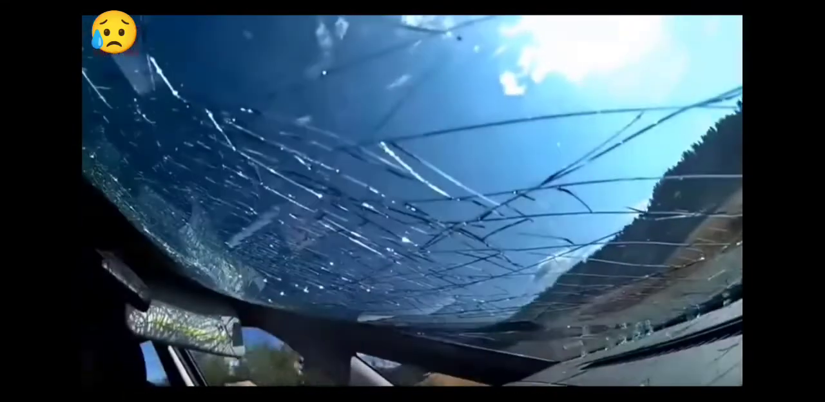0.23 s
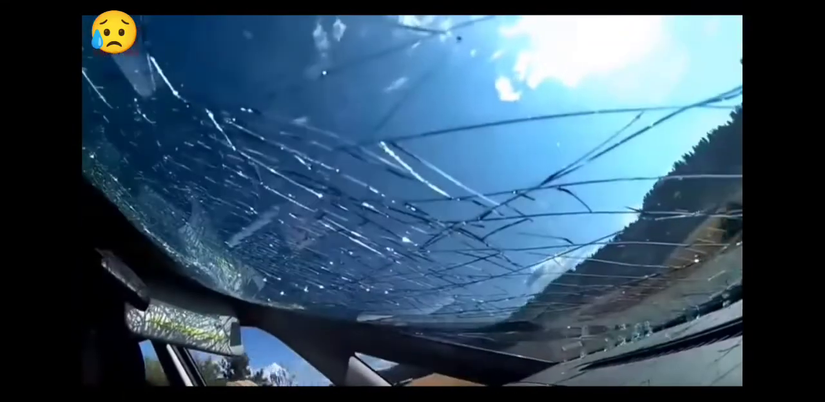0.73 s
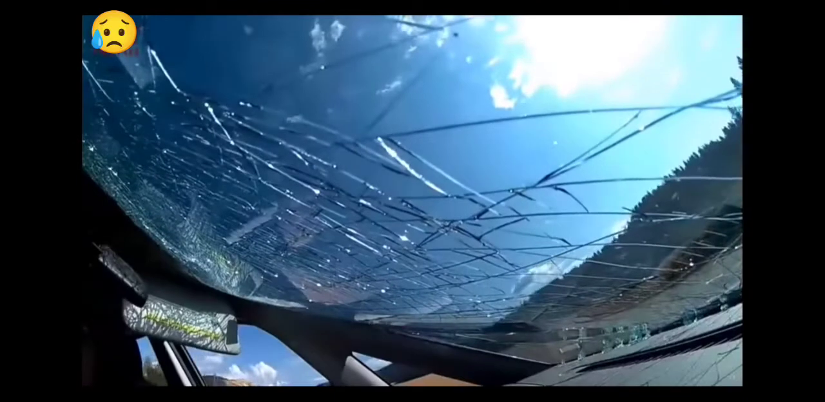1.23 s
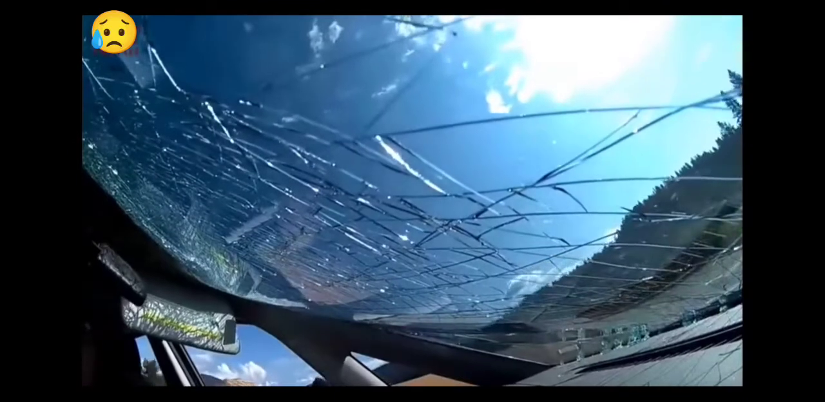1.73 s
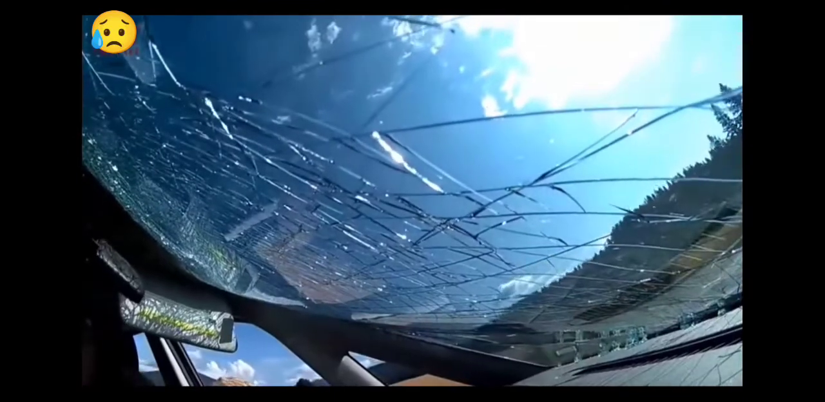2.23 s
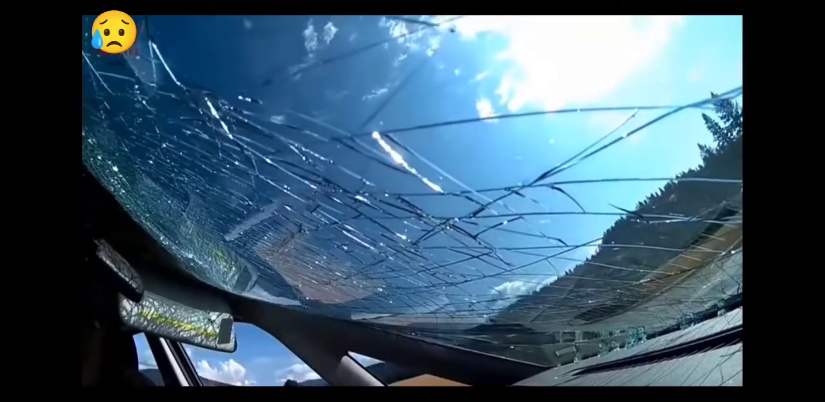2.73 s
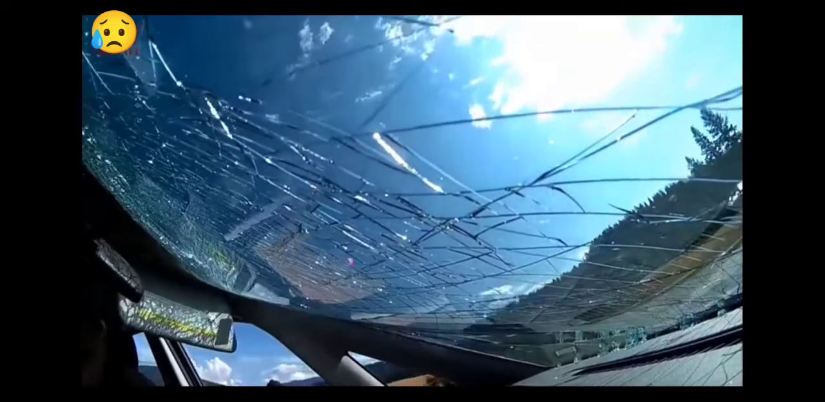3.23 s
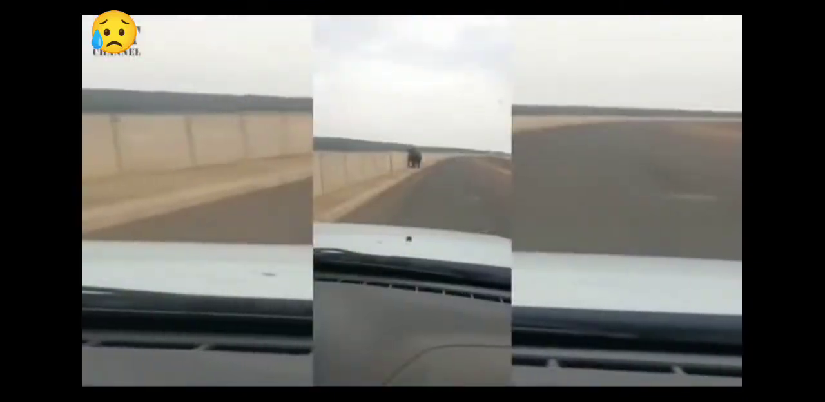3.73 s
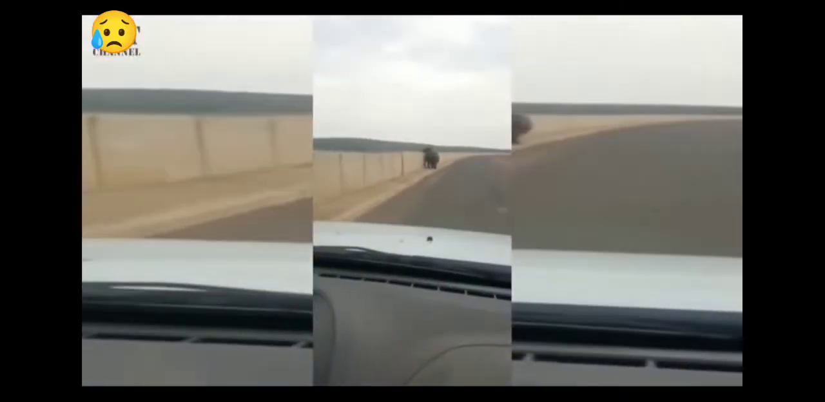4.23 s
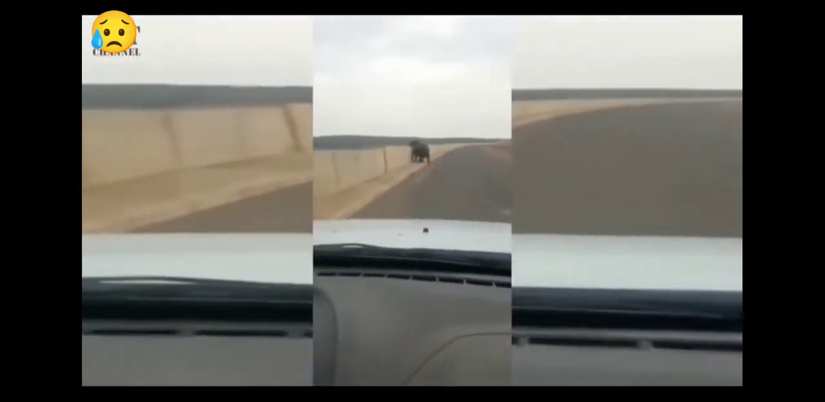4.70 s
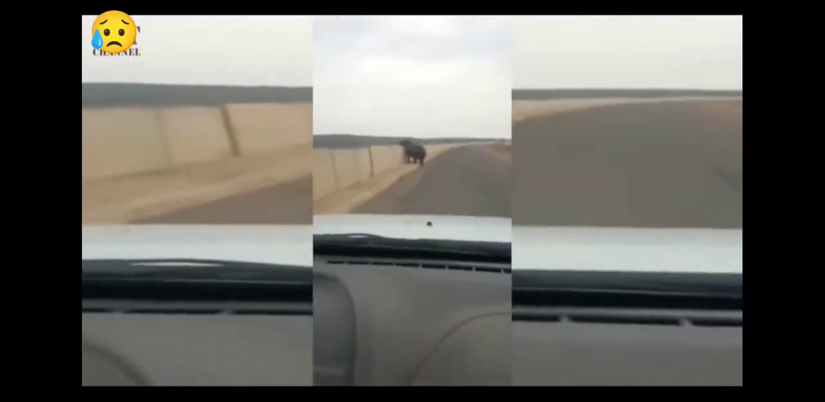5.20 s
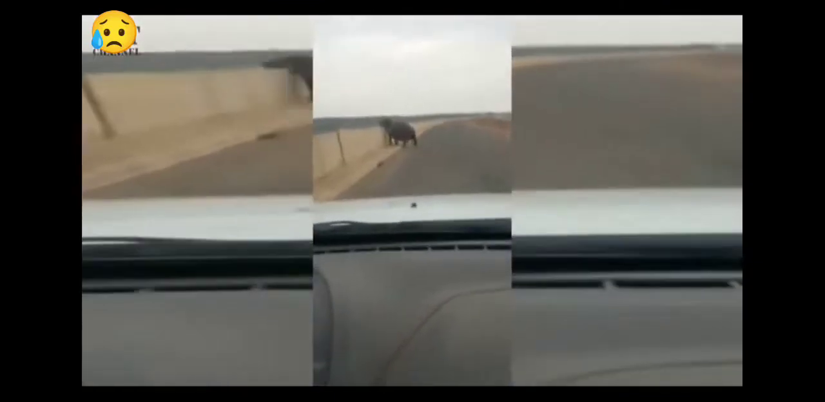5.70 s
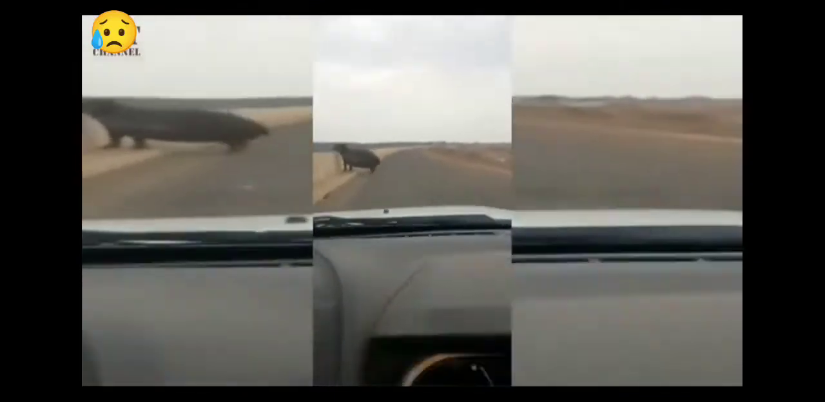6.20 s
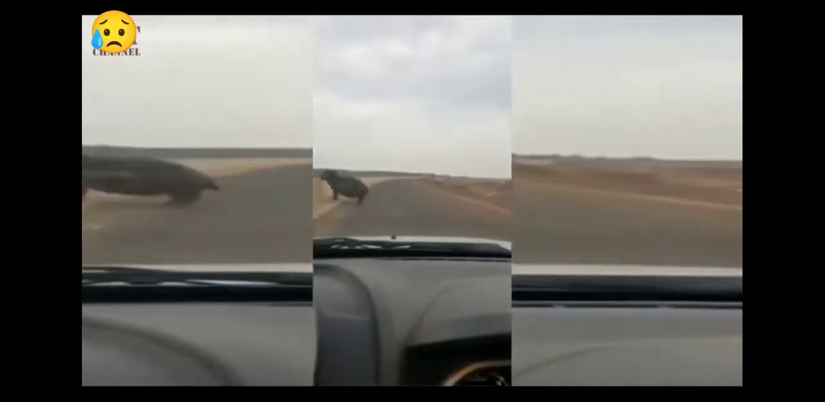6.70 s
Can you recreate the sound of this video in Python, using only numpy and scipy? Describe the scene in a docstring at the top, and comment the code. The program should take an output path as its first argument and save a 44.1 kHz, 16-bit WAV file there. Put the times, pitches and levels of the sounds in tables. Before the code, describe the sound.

Inside a car, a heavy impact and sharp glass cracks fade under sinking tyre hum, trim rattles, and a soft engine-and-road cruise follows.

```python
"""Car cabin after a crash at speed

The body booms, the broken windshield cracks and sheds crumbs of glass, and tyre roar and tread hum sink as
the car slows: filtered noise, ringing resonators and a gliding tone. Loose trim knocks, panels thud.
A quieter drive takes over: engine and cavity tones, road noise, buffeting air and hiss, ticks and rustles."""
import sys
import numpy as np
from scipy import signal
from scipy.fft import rfft, irfft, next_fast_len
from scipy.io import wavfile
from scipy.ndimage import uniform_filter1d

SR = 44100
rng = np.random.default_rng(int(sys.argv[2]) if len(sys.argv) > 2 else 0)


def master_out(mix):
    """Clip the mix to full scale and print it as 16-bit PCM to the path in sys.argv[1]."""
    frames = np.transpose(np.atleast_2d(mix))
    ceiling = np.clip(frames, -1, 1)
    pcm = np.round(ceiling * 32767).astype(np.int16)
    wavfile.write(sys.argv[1], SR, pcm)


N = 306495
SECONDS = np.arange(N) / SR

# Spectra of the slowing car's noise layers. Each row: frequency in Hz, relative level in dB.
HEAVE_SPECTRUM = [(16, -20), (26, 17), (35, 9.5), (48, 12), (58, -10)]
BOOM_SPECTRUM = [(48, -2.5), (58, 1), (75, 0), (100, -3), (130, -18.5)]
RUMBLE_SPECTRUM = [(65, -28.5), (110, -15), (124, 0), (232, 0.5), (269, -3.5), (345, -6), (532, -18),
                   (600, -20), (780, -46.5), (1320, -120)]
ROAR_SPECTRUM = [(260, -18.5), (450, 0), (729, -3.5), (856, -1.5), (1150, -3), (1500, -8), (1580, -6.5),
                 (1720, -14), (2330, -24), (2800, -28), (3640, -38.5), (6160, -120)]
# Stereo width of the crash noise. Each row: frequency in Hz, side against mid in dB.
CRASH_WIDTH = [(20, -78.5), (400, -64.5), (800, -24.5), (4400, -25.5), (15000, -8.5)]
# Levels at time zero in dB, and steady fades in dB per second; the boom holds its level.
HEAVE_DB, HEAVE_FADE_DB_PER_S = -20, 4
BOOM_DB = -23.5
RUMBLE_DB, RUMBLE_FADE_DB_PER_S = -18.5, 4.5
ROAR_DB, ROAR_FADE_DB_PER_S, ROLLING_DB = -28, 6.5, -46  # the roar sinks to that of slow rolling
# The blow at the start dies away in every layer.
IMPACT_HEAVE_DB, IMPACT_BOOM_DB, IMPACT_RUMBLE_DB, IMPACT_ROAR_DB, IMPACT_GLASS_DB = -8, -10.5, -12.5, -19, -31
IMPACT_FADE_DB_PER_S = 165
# Jolts that rock the body. Each row: start in seconds, length in seconds, heave level in dB.
BODY_JOLTS = [(.1, .12, -23), (.42, 0.11, -16), (.68, 0.022, -19), (.77, 0.078, -19), (1.28, 0.052, -17.5),
              (1.45, 0.25, -21), (1.62, 0.29, -22.5), (2.66, 0.14, -32), (3.35, 0.045, -31)]
JOLT_RUMBLE_DB = -4.5  # cabin rumble against the heave of a jolt

# Tread hum falling with the speed. Each row: time in seconds, mean pitch in Hz.
TREAD_PITCH = [(0.949, 254.4), (1.2, 240.7), (1.302, 221.7), (1.57, 195.6), (1.748, 187.3), (2.2, 160.6),
               (2.5, 150.5)]
# Cabin resonances that the hum sweeps through. Each row: frequency in Hz, width in Hz, added gain in dB.
HUM_RESONANCES = [(233.6, 30, -25.5), (189.3, 7.4, -25)]
HUM_DB = -32.5  # between the resonances

# Windshield cracks. Each row: start in seconds, peak level in dB, edge against body in dB,
# decay by 60 dB in seconds, ring of the shard in Hz, shard against body in dB.
WINDSHIELD_CRACKS = [(0.0277, -7, -19.5, 0.028, 4300, -19), (0.048, -28, -9, 0.014, 2500, -10),
                     (0.0588, -12.5, -22, 0.019, 2480, -1), (.097, -23, -15, .037, 1400, 3),
                     (0.149, -9, -25.5, 0.094, 1010, -18), (.321, -18, -17, 0.091, 1740, 2),
                     (0.3294, -21.5, 6, 0.012, 6500, -14), (0.429, -23.5, -17, 0.062, 1100, -5),
                     (.565, -22.5, -19, 0.18, 1570, -12), (0.591, -21.5, -18, 0.25, 1290, 1),
                     (0.613, -17.5, -27, 0.019, 1090, 7), (0.6632, -14, -28, 0.0087, 2560, 2),
                     (0.8281, -10, -4.5, 0.024, 2900, -3), (0.9343, -17.5, -7, 0.024, 4740, -21),
                     (1.0432, -19.5, -22, 0.011, 2150, -3), (1.102, -24, -19.5, 0.081, 1740, -5),
                     (1.184, -22.5, -28, 0.077, 3620, -19), (1.7925, -11, -11, 0.04, 1530, -13),
                     (2.154, -39, 11, 0.081, 6150, -13), (2.503, -34.5, 9, 0.012, 5670, 11),
                     (2.61, -40.5, 21, .018, 5500, -7), (2.691, -32.5, -28, 0.057, 2510, -9),
                     (2.777, -33, -10, 0.026, 4800, 5), (2.872, -36.5, 3, 0.017, 5370, -15),
                     (3.09, -26.5, -20, 0.093, 1450, -5), (3.101, -28, -15.5, 0.037, 3450, -6),
                     (3.278, -28.5, -21, 0.083, 4100, -14), (3.3715, -31.5, -5, 0.038, 2700, 7)]
# Spectra of a crack's body and bright edge. Each row: frequency in Hz, relative level in dB.
CRACK_BODY_SPECTRUM = [(250, -13), (500, 19), (1000, 17.5), (1600, 17), (2100, 9.5), (2900, 3.5),
                       (4100, -8.5), (6000, -32)]
CRACK_EDGE_SPECTRUM = [(2500, -8), (3400, 3.5), (4500, 5), (5800, 1.5), (7500, 1), (10000, -5), (11700, 1),
                       (14000, -17), (15500, -19.5)]
# Modes of the pane. Each row: frequency in Hz, width in Hz, relative level in dB.
PANE_MODES = [(995, 90, 1), (1600, 90, 2), (2260, 140, -5), (2960, 100, 1), (3700, 100, -1),
              (4750, 120, -3), (5770, 90, 3), (6930, 130, -2)]
SPRAY_DB, SPRAY_T60_S = -19.5, 0.15  # splinters after each crack, before the edge filter
SHARD_WIDTH_HZ = 130

# Spectrum of fine glass grit. Each row: frequency in Hz, relative level in dB.
GRIT_SPECTRUM = [(1200, -8.5), (2000, 3.5), (2800, 0), (3600, -1.5), (4600, -0.5), (5600, -4),
                 (7500, -16.5), (10000, -19.5), (11600, -12), (15000, -45)]
GRIND_DB, GRIND_FADE_DB_PER_S, GRIND_REST_DB = -44.5, 16.5, -62.5  # the broken pane settles
GRIND_FITS_DB = 3.5  # spread of the grinding level
# The pane flexes and grinds again. Each row: start in seconds, length in seconds, level in dB.
PANE_FLEXES = [(.36, 0.52, -52), (1.57, 0.27, -59), (2.44, 0.35, -55), (2.92, 0.58, -52)]
# Coarse crumbs crunching where the pane is crushed. Each row: start in seconds, length in seconds, level in dB.
CRUMB_CRUNCHES = [(0, .05, -29), (.152, .04, -28), (.32, .04, -32), (.45, .26, -40), (3.088, .03, -41),
                  (3.23, .07, -49)]
# Glass edges squealing. Each row: start in seconds, length in seconds, level in dB.
EDGE_SQUEALS = [(3.018, .05, -55), (3.13, .07, -57)]
# Spectrum of the squeal. Each row: frequency in Hz, relative level in dB.
SQUEAL_SPECTRUM = [(2450, -20), (2700, -2), (2790, 2), (2890, -3), (3200, -18)]
# Small chips of glass falling. Each row: start in seconds, peak level in dB, ring in Hz.
GLASS_CHIPS = [(1.269, -48.5, 3800), (1.411, -47, 4470), (1.648, -41.5, 4760), (1.912, -50, 5470),
               (1.961, -45, 4470), (2.03, -52, 5500), (2.291, -48.5, 5500), (2.459, -47, 3970),
               (3.237, -45, 5000), (3.334, -49, 4000)]

# Panels thudding. Each row: start in seconds, peak level in dB, centre frequency in Hz.
PANEL_THUDS = [(.011, -12, 560), (.029, -13, 650), (0.039, -21, 306), (0.057, -5, 247), (.151, -13, 596),
               (.187, -14, 330), (.324, -17, 600), (.831, -14.5, 590), (0.934, -17, 475), (1.797, -15, 415),
               (2.644, -24, 700), (3.373, -21, 108), (3.423, -24, 134), (3.473, -22.5, 338),
               (4.636, -30.5, 1000), (5.483, -32, 690), (5.613, -23, 329), (5.613, -31.5, 940),
               (6.081, -36, 750)]
# Loose trim knocking. Each row: start in seconds, peak level in dB, pitch as a ratio to the usual ring,
# change of the upper modes in dB, change of the lowest mode in dB.
TRIM_KNOCKS = [(3.372, -28, .85, -8, -6), (3.413, -32, 1.07, 8, -6), (3.426, -20, 1.03, -6, -6),
               (3.472, -25, 1.02, 2, 6), (3.526, -38, 1.03, 4, 0), (3.550, -28, 1.0, -2, -6),
               (3.602, -33, .94, 0, 0), (3.6135, -24.5, .97, 3, -8), (3.679, -32, .86, 1, -6)]
# Modes of the trim. Each row: nominal frequency in Hz, decay by 60 dB in seconds, relative level in dB.
TRIM_MODES = [(370, .04, -4), (820, .02, -6), (1060, 0.032, 3), (1590, .024, -2), (1900, 0.016, -4),
              (2320, 0.036, -7)]
KNOCK_SAG, KNOCK_SETTLE_S = .12, .005  # initial flatness as a share of pitch, and its time constant
# Small plastic ticks. Each row: start in seconds, peak level in dB, ring in Hz, decay by 60 dB in seconds,
# level two octaves above the ring in dB.
PLASTIC_TICKS = [(3.5798, -29, 3600, .002, -22), (4.0317, -21.5, 2100, .003, -25),
                 (4.534, -33, 2900, .014, -42), (4.590, -38, 2000, .014, -28),
                 (4.6345, -26, 8500, .018, -22), (4.636, -31, 1600, .02, -18),
                 (5.192, -39, 3000, .006, -18), (5.606, -34, 7000, .008, -22),
                 (5.6115, -31, 2800, .018, -20), (5.6125, -33, 11000, .01, -22),
                 (6.0088, -25, 2200, .004, -26), (6.041, -31, 2000, .007, -26),
                 (6.082, -27.5, 2400, .008, -26), (6.841, -42, 5500, .003, -22)]

CHANGE_S = 3.43  # the quiet drive takes over
# Engine. Each row: time in seconds, firing rate in Hz, firing line in dB, half-order line in dB.
ENGINE_LINES = [(3.5, 105.1, -34.5, -38), (3.8, 104.1, -44, -57), (4.5, 104.4, -39.5, -44),
                (4.95, 101.5, -41, -35.5), (5.3, 104.5, -39, -38), (6, 107.2, -38, -37),
                (6.12, 106.3, -48.5, -60), (6.5, 109.8, -43.5, -57), (6.95, 109.5, -45, -59)]
# Upper lines of the engine. Each row: multiple of the firing rate, mean level in dB.
ENGINE_ORDERS = [(2, -49), (3, -63), (3.5, -52), (4, -60), (5, -59.5), (8, -63)]
# Tyre and road noise. Each row: time in seconds, tyre cavity drone in dB, road noise in dB.
CRUISE_LEVELS = [(3.5, -40.5, -38.5), (3.9, -36, -41.5), (4.35, -39, -42), (4.7, -36, -41.5),
                 (5.2, -41, -42.5), (5.5, -38.5, -39.5), (5.97, -38, -40.5), (6.15, -46.5, -46.5),
                 (6.42, -43.5, -43), (6.95, -44.5, -46.5)]
# Spectra of the driving noise. Each row: frequency in Hz, relative level in dB.
CAVITY_SPECTRUM = [(120, -7.5), (155, -6), (180, 1), (203, -4), (228, -3), (260, -14)]
ROAD_SPECTRUM = [(150, -47.5), (260, -8), (302, -6), (328, -7), (366, -1.5), (481, -8), (527, -7.5),
                 (578, -12), (706, -11.5), (761, -18), (820, -16), (1100, -22.5), (1900, -39.5),
                 (2470, -62), (4180, -120)]
SLAP_SPECTRUM = [(690, -26), (820, 8), (910, -9), (1010, 0.5), (1140, -20.5)]
BUFFET_SPECTRUM = [(18, -26.5), (32, -4), (56, -14), (85, -9), (130, -18.5)]
WIND_SPECTRUM = [(1050, -3), (1300, -3), (1700, -4.5), (2300, -7), (4000, -16), (7000, -22), (11000, -26),
                 (15000, -32)]
# Stereo width of the cabin noise. Each row: frequency in Hz, side against mid in dB.
CABIN_WIDTH = [(20, -10), (200, -17.5), (380, -10.5), (700, -1), (1300, 1), (15000, -0.5)]
# Singing air in the tyres. Each row: time in seconds, mean pitch in Hz, mean level in dB.
CAVITY_TONE = [(3.6, 194, -46), (3.95, 195, -40), (4.4, 192, -44), (5.0, 201, -40), (5.5, 183, -41),
               (6.05, 178, -47), (6.4, 193, -46), (6.95, 196, -51)]
SLAP_DB = -56
# Gusts that buffet the cabin. Each row: start in seconds, length in seconds, level in dB before the throb.
CABIN_GUSTS = [(3.45, 0.3, -32.5), (3.75, 0.92, -36), (5.28, 0.55, -39), (5.75, 0.31, -40.5),
               (6.35, 0.14, -36.5)]
CALM_DB = -45  # buffeting between gusts, before the throb
# Throbbing cabin air. Each row: time in seconds, mean pitch in Hz, fundamental in dB, octave in dB.
CABIN_THROB = [(3.6, 33, -55, -53), (3.95, 32.35, -42, -31), (4.351, 32.94, -28.5, -43),
               (4.75, 32.8, -32.5, -44), (5.05, 33.4, -43, -47)]
THROB_WAVER_DB = 1
# Hiss at the seals. Each row: time in seconds, level in dB.
WIND_LEVEL = [(3.6, -57), (3.85, -63), (4.15, -56.5), (4.9, -59.5), (5.7, -56.5), (5.95, -62.5), (6.4, -58),
              (6.95, -61.5)]
WIND_FLUTTER_DB, WIND_PAN_DB = 1.2, -2
# Rustles. Each row: start in seconds, length in seconds, relative level in dB, emphasized frequency in Hz.
CABIN_RUSTLES = [(4.078, 0.13, -61.5, 6000), (4.314, 0.055, -56.5, 9000), (4.606, 0.069, -58, 7990),
                 (4.795, 0.11, -58.5, 3600), (5.08, 0.13, -60.5, 9600), (5.36, 0.41, -60, 3700),
                 (5.532, 0.092, -65, 3580), (5.595, 0.079, -48, 6500), (5.677, 0.056, -47.5, 3700),
                 (6.001, 0.11, -50, 4847), (6.073, .08, -63, 13000), (6.17, 0.19, -62.5, 3320)]
# Soft scuffs. Each row: start in seconds, length in seconds, level in dB.
CABIN_SCUFFS = [(4.318, 0.02, -42), (5.1, 0.08, -52), (5.122, .02, -46), (5.935, 0.046, -54.5),
                (6.36, 0.075, -56)]
# Spectra of the rustles and scuffs. Each row: frequency in Hz, relative level in dB.
RUSTLE_SPECTRUM = [(1060, -60), (1800, 3), (2600, 2.5), (3600, 4), (4760, 1), (6770, 0.5), (10000, -4),
                   (13300, -4.5), (15500, -10)]
SCUFF_SPECTRUM = [(1050, 7), (1280, 7.5), (1420, 1), (1580, 1.5), (1850, -7), (2150, -7), (3200, -16)]
RUSTLE_GRAIN_DB, RUSTLE_CATCH_DB, RUSTLE_PAN_DB = 1.5, .7, -4.5
TOP_HZ = 15500


def slowing_car():
    """Broadband excitation: the blow and jolts drive low noise bands, and most sink as the car slows."""
    jolts = swells(BODY_JOLTS, rise=0.3, fall=0.39)
    heave = together(impact(IMPACT_HEAVE_DB), fading(HEAVE_DB, HEAVE_FADE_DB_PER_S), jolts)
    boom = together(impact(IMPACT_BOOM_DB), undb(BOOM_DB))
    rumble = together(impact(IMPACT_RUMBLE_DB), fading(RUMBLE_DB, RUMBLE_FADE_DB_PER_S),
                      jolts * undb(JOLT_RUMBLE_DB))
    roar = together(impact(IMPACT_ROAR_DB), fading(ROAR_DB, ROAR_FADE_DB_PER_S), undb(ROLLING_DB))
    return (heave * flow(HEAVE_SPECTRUM, CRASH_WIDTH, flutter_db=1.5)
            + boom * flow(BOOM_SPECTRUM, CRASH_WIDTH, flutter_db=1.5)
            + rumble * flow(RUMBLE_SPECTRUM, CRASH_WIDTH, flutter_db=1.2)
            + roar * flow(ROAR_SPECTRUM, CRASH_WIDTH, flutter_db=1.0, rate=71))


def impact(db):
    """Exponential decay: the first blow dies away at a constant rate in dB."""
    return fading(db, IMPACT_FADE_DB_PER_S)


def tread_hum():
    """Swept resonance: the hum falls with the speed and swells as it crosses each cabin resonance."""
    hz, = curves(TREAD_PITCH)
    gain = undb(HUM_DB)
    for centre, width, db in HUM_RESONANCES:
        gain = gain + undb(db) / (1 + (2 * (hz - centre) / width) ** 4)
    tone = unit(np.sin(phase_of(hz * (1 + .012 * walk(40))))) * undb(2 * walk(45))
    return tone * gain * during(TREAD_PITCH[0][0], TREAD_PITCH[-1][0])


def cracks():
    """Brittle fracture: a jerky run rings the pane and a shard, and throws a bright spray of splinters."""
    out = np.zeros((2, N))
    for s, peak_db, edge_db, t60, shard_hz, shard_db in WINDSHIELD_CRACKS:
        run = sputter(burst(t60, side_db=-22, rise=0.00093), spread_db=2.2)
        snap = run + undb(-8.0) * burst(t60=0.009, side_db=-18.0, rise=0.0043)
        spray = sputter(burst(SPRAY_T60_S, side_db=-10), spread_db=5)
        shard = ring(snap, [(shard_hz, SHARD_WIDTH_HZ, 0), (shard_hz, shard_hz / 2, -9)])
        shard = colour(shard, [(shard_hz * 0.5, -14), (shard_hz, 0), (shard_hz * 1.92, -14)])
        bright = snap + undb(SPRAY_DB) * spray
        body = unit(colour(snap + ring(snap, PANE_MODES), CRACK_BODY_SPECTRUM))
        edge = unit(colour(bright + ring(bright, PANE_MODES), CRACK_EDGE_SPECTRUM))
        add(out, s, body + undb(edge_db) * edge + undb(shard_db) * unit(shard), peak_db)
    return out


def crumbs():
    """Granular friction: broken edges grind as fine grit, crunch as coarse crumbs and squeal roughly."""
    fine = grains(per_s=1800, scatter_db=3, width_hz=60, low_hz=1500, high_hz=14000)
    coarse = grains(per_s=420, scatter_db=3.4, width_hz=110, low_hz=700, high_hz=5200)
    grind = together(impact(IMPACT_GLASS_DB), fading(GRIND_DB, GRIND_FADE_DB_PER_S), undb(GRIND_REST_DB),
                     swells(PANE_FLEXES, rise=0.1, fall=0.92))
    fits = unit(undb(GRIND_FITS_DB * walk(22.13)))
    crunch = unit(colour(coarse, [(700, 2.5), (1600, 0.5), (3000, -9.5), (5000, -16), (7000, -30)]))
    crunch = crunch * swells(CRUMB_CRUNCHES, rise=0.49, fall=1.0)
    squeal = flow(SQUEAL_SPECTRUM, CRASH_WIDTH, flutter_db=4, rate=60) * swells(EDGE_SQUEALS, rise=.2, fall=.3)
    return unit(colour(fine, GRIT_SPECTRUM)) * grind * fits + crunch + squeal


def grains(per_s, scatter_db, width_hz, low_hz, high_hz, count=18):
    """Shot excitation: random clicks of scattered size each ring one of a few shard pitches."""
    out = 0
    for hz in np.geomspace(low_hz, high_hz, count) * undb(.5 * rng.standard_normal(count)):
        clicks, at = np.zeros(N), rng.integers(0, N, 4000)
        chance, size = rng.random((2, len(at)))
        kept = chance < per_s * N / SR / count / len(at)
        clicks[at] = undb(scatter_db * np.minimum(-np.log(size), 4)) * kept
        out = out + ring(clicks, [(hz, width_hz * np.sqrt(hz / 3000), 0), (hz, hz, -18)])
    return out


def chips():
    """Struck plate: each falling chip ticks against the pane and rings at its own pitch."""
    out = np.zeros((2, N))
    for s, db, hz in GLASS_CHIPS:
        tick = burst(t60=0.077, side_db=-22, rise=0.00066)
        spectrum = [(hz / 2, -8), (hz, 0), (1.8 * hz, -16), (3 * hz, -22)]
        add(out, s, colour(tick + ring(tick, PANE_MODES), spectrum), db)
    return out


def panel_thuds():
    """Damped impact: larger panels give a short noise burst about one broad resonance."""
    out = np.zeros((2, N))
    for s, db, hz in PANEL_THUDS:
        add(out, s, colour(burst(t60=0.038, side_db=-50), [(hz / 2, -8), (hz, 0), (2 * hz, -16)]), db)
    return out


def trim_knocks():
    """Modal ringing: loose trim knocks repeatedly with a hollow ring."""
    out = np.zeros((2, N))
    for s, db, pitch, upper_db, low_db in TRIM_KNOCKS:
        add(out, s, knock(pitch, upper_db, low_db), db)
    return out


def knock(pitch, upper_db, low_db, rise=0.0022):
    """Contact loading: modes rise in pitch as a padded blow lets go; a rattle sounds with it and lasts longer."""
    t = np.arange(SR // 8) / SR
    bent = np.cumsum(1 - KNOCK_SAG * np.exp(-t / KNOCK_SETTLE_S)) / SR
    tone = 0
    for k, (hz, t60, db) in enumerate(TRIM_MODES):
        level_db = db + upper_db * (k > 2) + low_db * (k == 0)
        cycles = hz * pitch * rng.uniform(.98, 1.02) * bent + rng.random()
        tone = tone + undb(level_db - 60 * t / t60) * np.sin(2 * np.pi * cycles)
    rattle = colour(burst(t60=.13, side_db=-8, rise=.001), [(350, 0), (900, 1), (2200, -4), (3000, -26)])
    return unit(tone * (1 - np.exp(-(t / rise) ** 2))) + undb(-7) * unit(rattle)


def plastic_ticks():
    """Short contact: small plastic parts tick with a rapid decay and a faint longer tail."""
    out = np.zeros((2, N))
    for s, db, hz, t60, top_db in PLASTIC_TICKS:
        contact = burst(t60, side_db=-9) + undb(-32) * burst(t60=.05, side_db=0)
        tick = colour(contact, [(hz / 2, -11), (hz, 0), (1.7 * hz, -10), (4 * hz, top_db)])
        add(out, s, pan(tick, -1.0), db)
    return out


def engine():
    """Harmonic series: the firing line, its half order and wavering upper orders follow the firing rate."""
    firing_hz, firing_db, half_db = curves(ENGINE_LINES)
    low_lines = drone(firing_hz / 2, half_db, firing_db, waver_db=0.5)
    phase = phase_of(firing_hz * (1 + .004 * walk(7)))
    upper_lines = sum(unit(np.sin(k * phase)) * undb(db + 2 * walk(5)) for k, db in ENGINE_ORDERS)
    return pan(low_lines + upper_lines, 0.94)


def road_and_cavity_noise():
    """Resonant filtering: rolling noise is shaped by the road path and by the tyres' air cavities."""
    cavity_db, road_db = curves(CRUISE_LEVELS)
    cavity = flow(CAVITY_SPECTRUM, CABIN_WIDTH, flutter_db=1.0) * undb(cavity_db)
    road = flow(ROAD_SPECTRUM, CABIN_WIDTH, flutter_db=0.7) * undb(road_db)
    return pan(cavity, 0.94) + pan(road, 0.64)


def tyres():
    """Cavity resonance: the tyres' air sings unsteadily while the tread slaps the road."""
    hz, db = curves(CAVITY_TONE)
    tone = unit(np.sin(phase_of(hz * (1 + .02 * walk(14))))) * undb(db + 2.5 * walk(10))
    slap = flow(SLAP_SPECTRUM, CABIN_WIDTH, flutter_db=2, rate=27)
    return tone + slap * undb(SLAP_DB)


def cabin_air():
    """Flow locking: the air buffets at random, and less so while it locks into a throb."""
    throb_hz, throb_db, octave_db = curves(CABIN_THROB)
    gusts = together(swells(CABIN_GUSTS, rise=0.22, fall=.25), undb(CALM_DB))
    unlocked = 1 / np.sqrt(1 + undb(throb_db + 26.0) ** 2)
    buffet = flow(BUFFET_SPECTRUM, CABIN_WIDTH, flutter_db=1.5) * gusts * unlocked
    throb = drone(throb_hz, throb_db, octave_db, waver_db=THROB_WAVER_DB)
    return pan(buffet + throb * during(CABIN_THROB[0][0], CABIN_THROB[-1][0]), 0.94)


def wind():
    """Turbulence noise: air at the seals gives a thin fluttering hiss."""
    wind_db, = curves(WIND_LEVEL)
    hiss = flow(WIND_SPECTRUM, CABIN_WIDTH, flutter_db=WIND_FLUTTER_DB, rate=40)
    return pan(hiss, WIND_PAN_DB) * undb(wind_db)


def rustles():
    """Stick-slip friction: something slides in grainy swishes of their own brightness and squeaky scuffs."""
    rub = flow(RUSTLE_SPECTRUM, CABIN_WIDTH, flutter_db=RUSTLE_GRAIN_DB, rate=330)
    rub = rub * unit(undb(RUSTLE_CATCH_DB * walk(70)))
    swishes = 0
    for s, length, db, hz in CABIN_RUSTLES:
        swish = unit(rub + ring(rub, [(hz, hz / 4, -1)]))
        swishes = swishes + swish * swells([(s, length, db + 2.0)], rise=0.41, fall=0.41)
    scuffs = flow(SCUFF_SPECTRUM, CABIN_WIDTH, flutter_db=1.5, rate=260)
    scuffs = scuffs * swells(CABIN_SCUFFS, rise=0.56, fall=0.96)
    return pan(swishes, RUSTLE_PAN_DB) + pan(scuffs, -4.5)


def drone(hz, low_db, octave_db, waver_db):
    """Harmonic pair: a low tone and its octave share a phase, each wavering in level."""
    phase = phase_of(hz * (1 + 0.0098 * walk(9)))
    return sum(unit(np.sin(k * phase)) * undb(db + waver_db * walk(2.6))
               for k, db in enumerate([low_db, octave_db], 1))


def flow(points, width, flutter_db, rate=14):
    """Turbulence: noise of a given spectrum and stereo width whose level flutters."""
    mid, side = colour(rng.standard_normal((2, N)), points)
    side = colour(side, width)
    # level the noise over an eighth of a second, then impose the flutter
    gain = unit(undb(flutter_db * walk(rate))) / np.sqrt(uniform_filter1d(mid ** 2, SR // 8))
    return gain * np.array([mid + side, mid - side])


def burst(t60, side_db, rise=0.000096):
    """Contact noise: a fast start and an exponential decay, cut at an eighth of a second."""
    t = np.arange(SR // 8) / SR
    envelope = (1 - np.exp(-t / rise)) * np.exp(-np.log(1000) * t / t60)
    return noise(side_db, size=len(t)) * envelope


def sputter(x, spread_db, step_s=.0012):
    """Intermittent motion: break a sound into tiny jerks of uneven strength."""
    k = int(step_s * SR)
    steps = np.repeat(rng.standard_normal(x.shape[-1] // k + 1), k)[:x.shape[-1]]
    return x * unit(uniform_filter1d(undb(spread_db * np.clip(steps, -2, 2)), k // 2 + 1))


def noise(side_db, size):
    """Partial coherence: stereo noise with a common part and an opposed part."""
    mid, side = rng.standard_normal((2, size))
    return np.array([mid + undb(side_db) * side, mid - undb(side_db) * side])


def ring(x, modes):
    """Modal superposition: resonances (Hz, width in Hz, dB) side by side."""
    out = 0
    for hz, width, db in modes:
        b, a = signal.iirpeak(hz, hz / min(width, SR / 4), fs=SR)
        out = out + undb(db) * signal.lfilter(b, a, x)
    return out


def colour(x, points, size=16384):
    """Minimum phase: a causal filter through (Hz, dB) points, falling away beyond its ends."""
    size = min(size, 2 * next_fast_len(x.shape[-1] // 2))
    hz, db = np.transpose(points)
    octave, at = np.log2(np.maximum(np.fft.rfftfreq(size, 1 / SR), 1)), np.log2(hz)
    outside = np.abs(octave - np.clip(octave, at[0], at[-1]))
    # 30 dB per octave outside the points, for three octaves
    cepstrum = irfft(np.log(undb(np.interp(octave, at, db) - 30 * np.minimum(outside, 3))))
    # folding the cepstrum makes the response causal
    cepstrum[1:size // 2] *= 2
    cepstrum[size // 2 + 1:] = 0
    response = irfft(np.exp(rfft(cepstrum)))[:size // 2]
    return signal.oaconvolve(x, np.array(response, ndmin=x.ndim), axes=-1)[..., :x.shape[-1]]


def phase_of(hz):
    """Phase accumulation: frequency integrated over time, in radians."""
    return 2 * np.pi * np.cumsum(hz) / SR


def walk(rate):
    """Smoothed random process: levels held 1 / rate seconds and slewed twice, scaled to rms 1."""
    k = int(SR / rate)
    held = np.repeat(rng.standard_normal(N // k + 1), k)
    return unit(uniform_filter1d(uniform_filter1d(held, k), k)[:N])


def swells(events, rise, fall):
    """Soft envelope: (start, length, dB) events; rise and fall are shares of the length about half height."""
    gains = []
    for s, length, db in events:
        along = (SECONDS - s) / length
        opening = .5 + .5 * np.tanh(2 * along / rise)
        closing = .5 + .5 * np.tanh(2 * (1 - along) / fall)
        gains.append(undb(db) * opening * closing)
    return together(*gains)


def together(*gains):
    """Incoherent addition: unrelated drives add in power."""
    return np.sqrt(sum(g ** 2 for g in gains))


def fading(db, db_per_s):
    """Exponential decay: a gain that starts at db and sinks steadily."""
    return undb(db - db_per_s * SECONDS)


def curves(table):
    """Linear interpolation: the columns of a table joined by straight lines in time."""
    s, *columns = np.transpose(table)
    return [np.interp(SECONDS, s, c) for c in columns]


def during(start, end, fade=0.033):
    """Gating: a linear fade in about the start and out about the end."""
    return np.clip(np.minimum(SECONDS - start, end - SECONDS) / fade + .5, 0, 1)


def add(out, s, sound, db):
    """Superposition: place a sound at time s with the given peak level."""
    i = int(s * SR)
    out[:, i:i + sound.shape[1]] += (sound * undb(db) / np.abs(sound).max())[:, :N - i]


def pan(x, db):
    """Interaural level difference: left louder than right by db."""
    return x * undb(np.array([[db], [-db]]) / 2)


def undb(db):
    """Logarithmic level: decibels to gain."""
    return 10 ** (np.asarray(db) / 20)


def unit(x):
    """Normalization: scale to rms 1."""
    return x / np.sqrt(np.mean(x ** 2))


def scene():
    """Superposition: crash noise fades into the quiet drive, with the struck sounds over both."""
    later = during(CHANGE_S, np.inf, fade=0.039)
    crash = slowing_car() + tread_hum() + crumbs()
    drive = engine() + road_and_cavity_noise() + tyres() + cabin_air() + wind() + rustles()
    strikes = cracks() + chips() + panel_thuds() + trim_knocks() + plastic_ticks()
    return crash * (1 - later) + drive * later + strikes


def record(dry):
    """Saturation and band limiting: round the loudest peaks, then cut the top steeply."""
    rounded = np.tanh(.7 * dry) / .7
    return signal.sosfilt(signal.ellip(8, .2, 80, TOP_HZ, fs=SR, output="sos"), rounded)


dry = scene()
out = record(dry)
master_out(out)
```